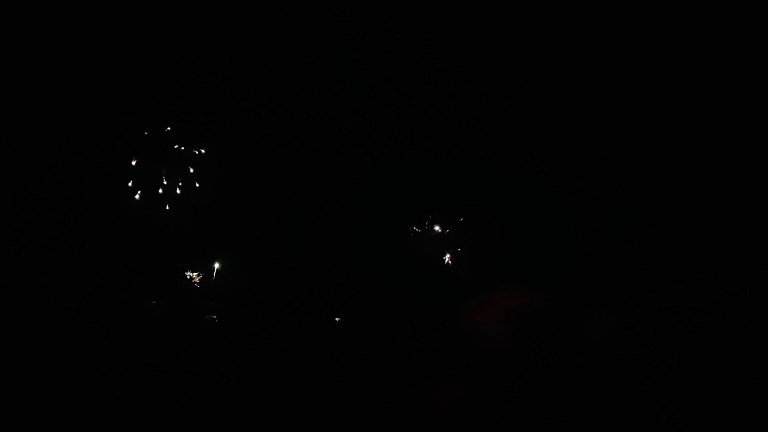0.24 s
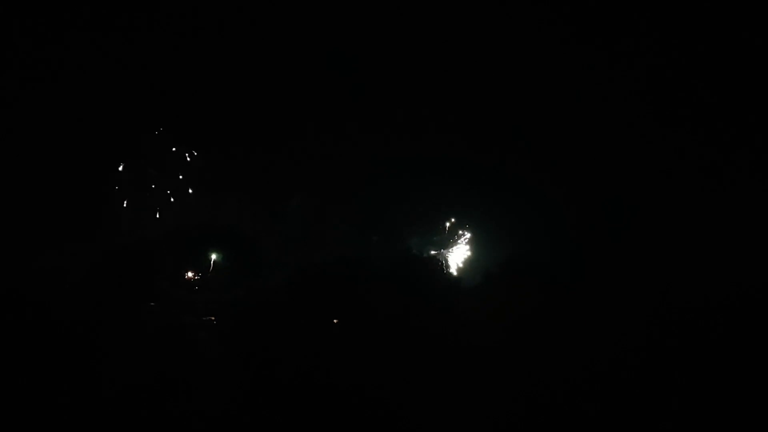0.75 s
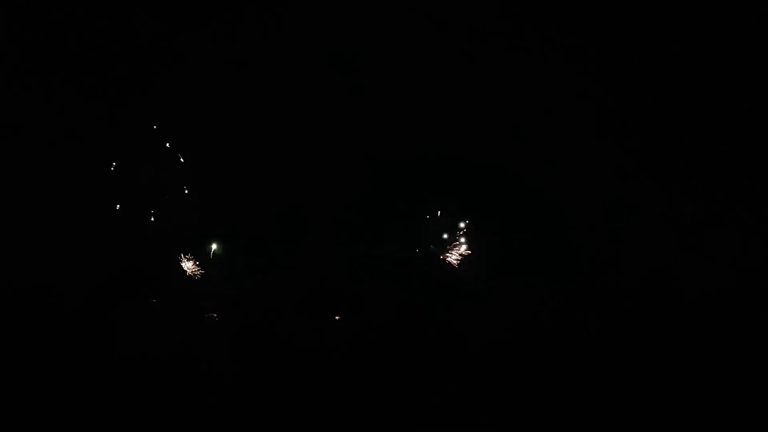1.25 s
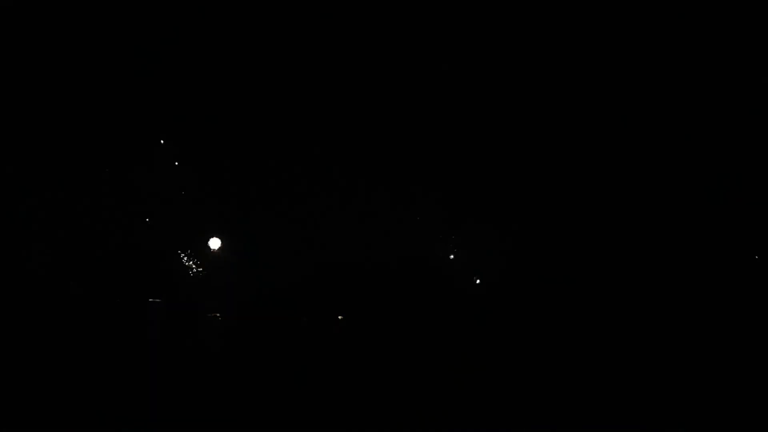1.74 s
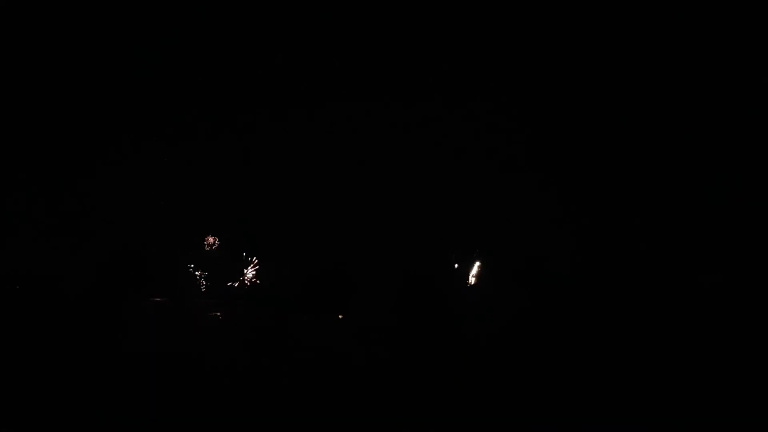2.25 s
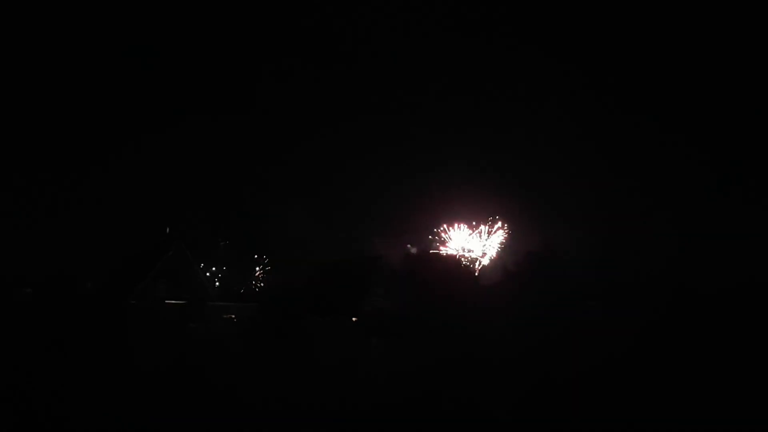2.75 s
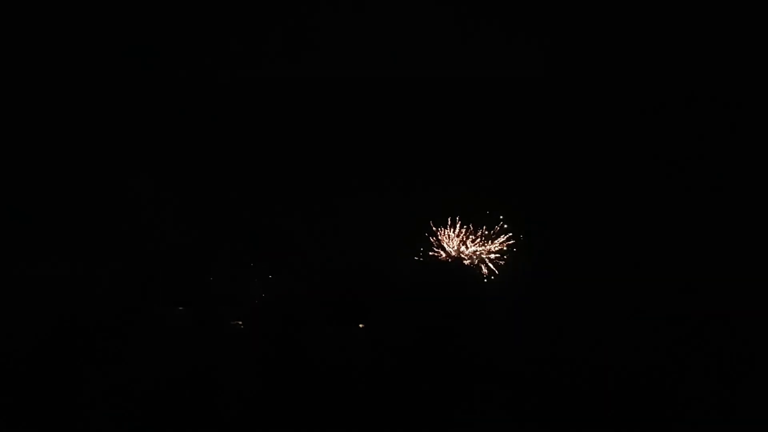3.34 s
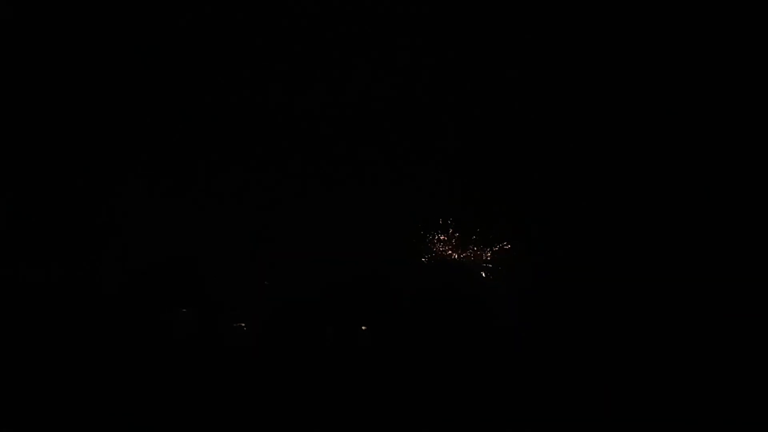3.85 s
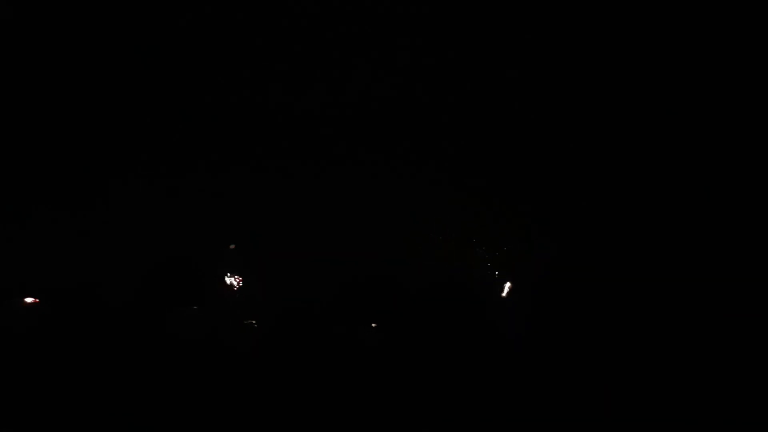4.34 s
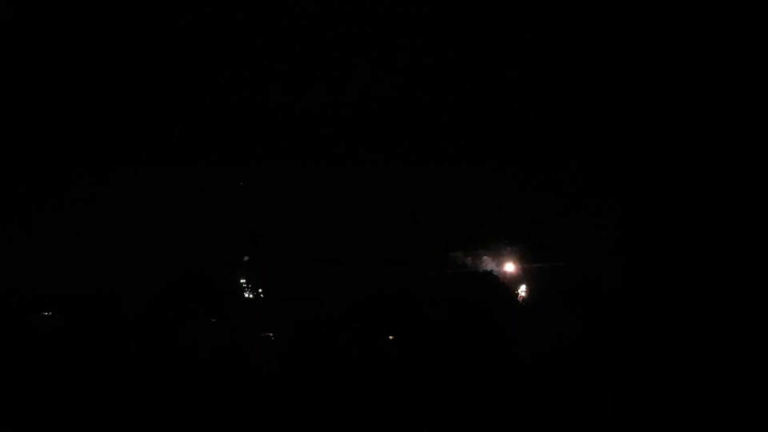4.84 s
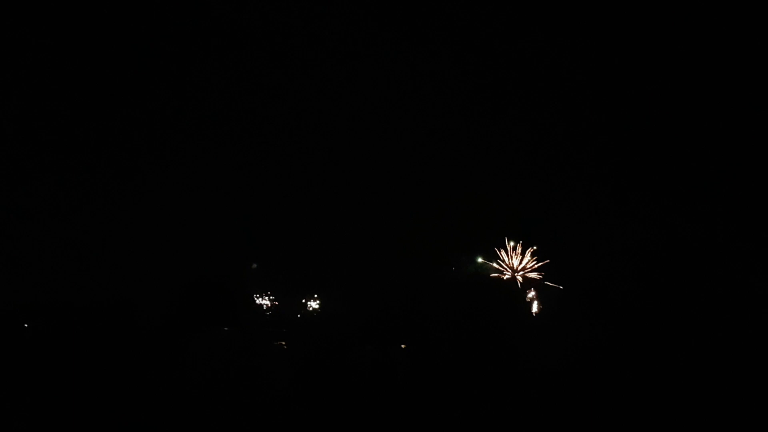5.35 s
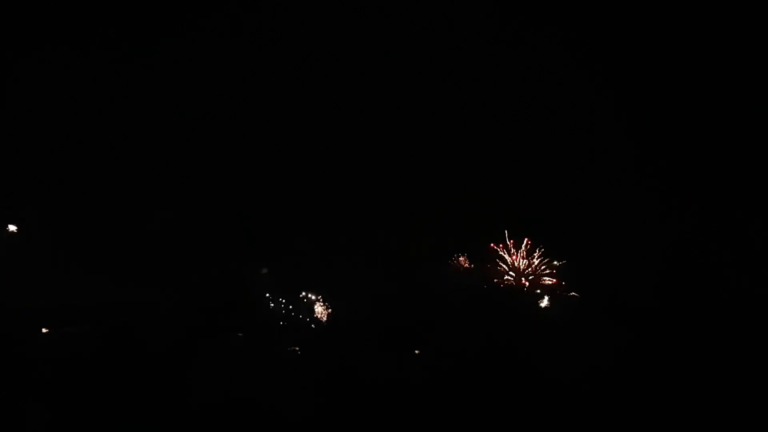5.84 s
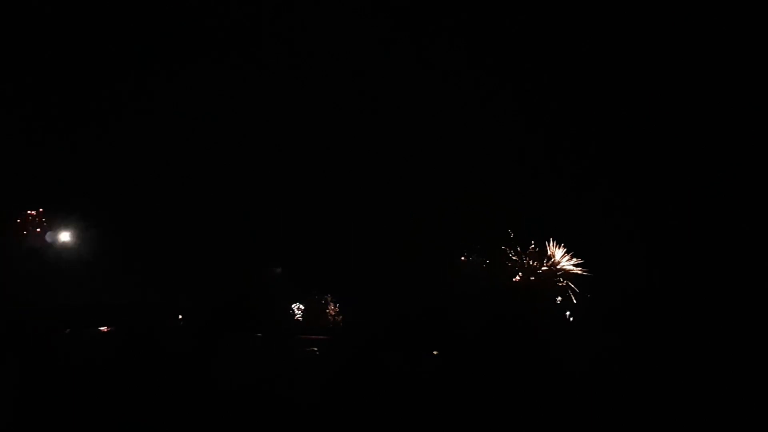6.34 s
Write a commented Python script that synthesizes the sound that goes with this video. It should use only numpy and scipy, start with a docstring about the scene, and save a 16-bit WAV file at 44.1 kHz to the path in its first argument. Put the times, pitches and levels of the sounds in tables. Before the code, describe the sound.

Outdoors at night, fireworks go off all around a town. A tight cluster of loud bangs opens, then crackling with tiny sharp snaps, more volleys, and one huge crack near the middle with a sizzling shower. Dull booms and a thin rocket whistle follow, then renewed bangs. Small stereo camera microphones overload on the strongest blasts.

```python
"""A town at night, with fireworks bursting all over it, heard from a distance on a camera's two small microphones.
Each nearer shell is a blast wave dulled by the air, bounced off the ground and scattered back by house fronts;
the strongest overload the microphone. Single stars nearby snap as tiny blasts.
Behind them countless far reports merge into a rolling mutter, and clouds of crackling stars swell and fade
as dense random clicks. A far rocket whistles and a brief whine falls, both as narrow bands of noise."""
import sys
import numpy as np
from scipy import signal
from scipy.fft import rfft, irfft, next_fast_len
from scipy.io import wavfile
from scipy.ndimage import map_coordinates

SR = 44100
rng = np.random.default_rng(int(sys.argv[2]) if len(sys.argv) > 2 else 0)


def wav_out(sig):
    """Save sig, one row per channel (or a flat mono array), as 16-bit PCM at SR to the path in sys.argv[1]."""
    wavfile.write(sys.argv[1], SR, np.round(np.clip(np.atleast_2d(sig).T, -1, 1) * 32767).astype(np.int16))


N = 290619


def amp(db):
    """Decibels to gain."""
    return 10 ** (np.asarray(db) / 20)


def unit(x):
    """Scale to rms 1."""
    return x / np.sqrt(np.mean(x ** 2) + 1e-20)


def along(points, hz):
    """Read (f/Hz, value) points on a log frequency axis."""
    f, values = np.transpose(points)
    return np.interp(np.log(hz + 1), np.log(f), values)


def curves(rows):
    """One value per sample for each column after the time."""
    times, *columns = np.transpose(rows)
    t = np.arange(N) / SR
    return [np.interp(t, times, column) for column in columns]


def wobble(rate):
    """A smooth random curve with rate knots a second."""
    knots = rng.standard_normal(int(N * rate / SR) + 4)
    return map_coordinates(knots, [np.arange(N) * rate / SR])


def filtered(x, response):
    """Apply a gain response(Hz) to x."""
    size = next_fast_len(N + SR // 2)
    spectrum = rfft(x, size) * response(np.fft.rfftfreq(size, 1 / SR))
    return irfft(spectrum, size)[..., :N]


def click(gain_db, size=4096):
    """The causal, minimum-phase pulse whose spectrum is gain_db(Hz)."""
    gain = amp(gain_db(np.fft.rfftfreq(size, 1 / SR)))
    cepstrum = irfft(np.log(np.maximum(gain, 1e-6)))
    # folding the cepstrum onto positive times makes the pulse causal
    cepstrum[1:size // 2] *= 2
    cepstrum[size // 2 + 1:] = 0
    return irfft(np.exp(rfft(cepstrum)))


def add(out, s, sound, lead_ms):
    """Mix a mono sound in at time s, earlier at the left port by lead_ms."""
    for port, side in enumerate((-1, 1)):
        start = round((s + side * lead_ms / 2 / 1000) * SR)
        out[port, start:][:len(sound)] += sound


def arrivals(rate, spread_db, size, port_ms=0.41):
    """Stereo impulses of rms 1 at random times, from all round the horizon, of scattered strength."""
    count = int(rate * size / SR) + 1
    when, angle = rng.random((2, count))
    scatter = np.clip(rng.standard_normal(count), -2.3, 2.3)
    strength = amp(spread_db * scatter) * rng.choice([-1, 1], count)
    lead = np.sin(2 * np.pi * angle) * port_ms * SR / 1000  # in samples
    ports = [np.round(when * size + side * lead / 2).astype(int) % size for side in (-1, 1)]
    return unit(np.array([np.bincount(i, strength, size) for i in ports]))


# The nearer shells, level being that of the direct wave and echo level relative to it:
# t/s, level/dB, wave length/ms, air loss/dB per kHz, left port lead/ms, ground bounce delay/ms, echo level/dB
NEARER_SHELLS = [(0.0138, -6, 2.2, 7.5, 0.25, .53, -2), (0.089, 7.5, 2.8, 0.9, 0.19, 0.79, -3.5),
                 (0.0989, 2, 2.96, 3.5, 0.0044, 1.72, -2.5), (0.1034, 5, 2.3, 1.4, 0.26, 0.62, -10),
                 (0.4755, -16, 1.55, 4, .11, 1.58, -23), (0.8409, -11, 3.55, 3, 0.051, 1.6, -1),
                 (0.986, -8.5, 0.78, 7, -0.3, 2.3, 2), (1.179, .3, 2.43, 4, 0.02, 2.3, 2.5),
                 (1.2097, -7, .9, 5, -0.41, 1.6, -11), (1.2899, 5, 2.3, 8, -0.31, 0.57, -5),
                 (1.3217, -1.1, 1.8, 4, 0.15, 0.88, -1.5), (1.355, -2.5, 2.07, 5.5, 0.31, 0.55, -16),
                 (1.5192, -21.5, 2.7, 7.5, 0.44, 3.4, 4), (1.7097, -15.5, 1.43, 8, -0.27, 0.86, -5),
                 (1.7817, -8, 2.4, 9, .13, .3, -6.5), (1.9427, -18, 2.5, 6, -0.3, 1.6, 1),
                 (1.9802, -14, 1.9, 7, -0.34, 3, -0.5), (2.0447, -8.5, 1.56, 8.5, -0.032, 0.61, 1.5),
                 (2.069, -9, 1.74, 8, -.25, 0.64, -15), (2.3388, 5, 2.36, 6.5, -0.35, 2.33, -10.5),
                 (2.3699, -2.5, 1.36, 2.5, -0.27, 1.7, -10), (2.3756, -2, 2.34, 4, -0.38, 0.59, -4),
                 (2.401, 0, 3.3, 2, -0.3, 2.6, -1.5), (2.4093, -1, 1.64, 5, -.36, 0.55, -9),
                 (2.4474, -1.5, 2.7, 2, -0.39, 2.81, 0), (2.4696, -1.5, 2.6, 1.4, .45, 1.7, -8),
                 (2.5165, -10.5, 1.7, 7, 0.37, 1.76, -12), (2.664, -16.5, 1.7, 4.5, -0.17, 1.6, 3),
                 (2.8765, -13, 2.6, 3.5, 0.098, 0.8, -0.5), (3.2712, 12, 1.78, 4.4, -0.054, 0.64, -12.5),
                 (3.2919, -1.5, 1.4, 2, 0.38, 0.6, 0), (3.3327, -3.5, 3.9, 3.5, -0.036, 1.67, -2.5),
                 (3.3413, -6.5, 3, 5, -0.086, 0.81, -9), (3.3945, -0.5, 2.23, 4, -0.0072, 3.06, -1),
                 (3.6819, -5, 11.5, 3.5, -0.055, 2.53, 2), (3.768, -19, 1.5, 6, -0.067, 1.1, 2),
                 (4.2058, -4, 3.55, 4, -0.25, 0.53, 3.5), (4.2246, -13, 6, 7, -0.21, 1.7, -8),
                 (4.2414, -4, 4.4, 3.5, -0.23, 0.64, 1), (4.2749, -10, 0.79, 6.5, -.29, .52, 3),
                 (4.352, -14.5, 1.6, 6.5, -0.063, 1.6, -4), (4.4965, -8.5, 2.9, 4.5, 0.34, 0.82, -1),
                 (4.533, -3, 2.64, 5.5, -0.36, 1.06, -2.5), (4.5996, -8.5, 1.45, 7.5, 0.46, 2.83, 0.5),
                 (4.8965, -10, 2.9, 6, -.32, 0.96, 3), (5.28, -12, 1.44, 4, -.16, 1.5, -3.5),
                 (5.3466, -4, 2.9, 9, -0.15, 1.25, 0.5), (5.487, -12, 3.4, 2.5, 0.19, 1.3, -1),
                 (5.6516, -12.5, 3.7, 11, -0.32, 1.5, -3), (5.725, 5, 2.67, 3.6, -0.042, 0.84, -3),
                 (5.7427, -1, 1.35, 3, 0.44, 2.1, 4.5), (5.7643, -5, 1.1, 2, .46, 0.7, -8),
                 (5.775, -4, 4.9, 2, 0.18, 1.46, -8), (5.9316, -2, 2.44, 4, .34, 0.52, -5),
                 (6.046, -6.5, 2.05, 7, -0.27, 1.2, -6), (6.065, -8, 2.56, 7, 0.11, 1.06, -5.5),
                 (6.1879, -14, 3.1, 3.5, -.16, 3.1, -4), (6.4486, -4, 1.6, 7.5, -0.18, 0.52, -4),
                 (6.4967, -11.5, 4.1, 4, 0, 2.65, 0.5), (6.5613, -5.5, 1.4, 5.5, 0.093, 2.16, 0)]


def shells(rows, early_air_db=-1.2, late_air_db=0.0, late_s=.07, bounce_share=0.56):
    """Every bang arrives straight and once more off the ground; the later an echo, the more air has dulled it."""
    out = np.zeros((2, N + SR))
    early = np.exp(-np.arange(SR // 2) / SR / late_s)
    for s, db, wave_ms, air_db, lead_ms, bounce_ms, echo_db in rows:
        front = amp(db) * blast(wave_ms, air_db)
        add(out, s, front, lead_ms)
        add(out, s + bounce_ms / 1000, bounce_share * front, lead_ms)
        walls = house_fronts(t60=0.46, build_s=0.0048, rate=3500, spread_db=4.0)
        for share, more_air_db in ((early, early_air_db), (1 - early, late_air_db)):
            echo = blast(wave_ms, air_db + more_air_db)
            tail = signal.fftconvolve(walls * share, echo[None], axes=1)
            out[:, round(s * SR):][:, :tail.shape[1]] += amp(db + echo_db) * tail
    return out[:, :N]


# Microphone colour on a blast: f/Hz, level/dB
MICROPHONE_COLOUR = [(100, -1), (700, .5), (1400, 0.5), (2200, 4.5), (4200, 3), (8000, 3.5), (9800, -9.5),
                     (16000, -2)]


def blast(wave_ms, air_db_per_khz, q=1.34, deepest_db=62):
    """A shock front, its suction phase and a rebound, rounded by the air; peak 1."""
    def gain_db(hz):
        s = 1j * hz * wave_ms / 1000
        wave = s * s / ((s * s + s / q + 1) * (s + 1))
        air_db = np.minimum(abs(air_db_per_khz) * hz / 1000, deepest_db)
        return 20 * np.log10(abs(wave) + 1e-4) - air_db + along(MICROPHONE_COLOUR, hz)
    pulse = click(gain_db)
    return pulse / abs(pulse).max()


def house_fronts(t60, build_s, rate, spread_db):
    """Separate reflections that set in after the blast and die away; mean energy 1 a port."""
    t = np.arange(SR // 2) / SR
    build = 1 - np.exp(-(t / build_s) ** 2)
    echoes = arrivals(rate, spread_db, size=len(t)) * amp(-60 * t / t60) * build
    return echoes / np.sqrt(np.sum(echoes ** 2) / 2)


def strays(reports_db, per_s=13, over_db=10, spread_db=4,
           wave_ms=1.74, air_db=6, lead_ms=.33, bounce_ms=1.1, echo_db=-5):
    """Rows for shells(): lesser shells all round at random times, louder while a volley is on."""
    count = int(per_s * N / SR)
    rows = []
    for when, strength, size, bearing, height in rng.uniform(-1, 1, (count, 5)):
        sample = int((when + 1) / 2 * (N - 1))
        db = reports_db[sample] + over_db + spread_db * strength
        rows.append((sample / SR, db, wave_ms * 2 ** size, air_db,
                     lead_ms * bearing, bounce_ms * 2 ** height, echo_db))
    return rows


# The nearest crackling stars, levels before the common trim: t/s, level/dB
NEAREST_STARS = [(0.5783, -27.5), (0.61, -24.5), (0.6266, -36), (0.7012, -33), (0.7916, -25), (0.8351, -25),
                 (0.8955, -23), (0.9383, -23), (0.9613, -25), (1.0153, -16), (1.0301, -17)]


def snaps(trim_db=-2.5, t60=0.014, wave_ms=0.35, air_db=0.7, lead_ms=-.2):
    """Single stars heard one by one: tiny blasts, each of its own size, smeared over a few ms."""
    out = np.zeros((2, N + SR))
    t = np.arange(SR // 50) / SR
    lesser = shower(start_s=.61, end_s=.97, first_db=-39, last_db=-25.5, spread_db=3, count=110)
    for s, db in [*NEAREST_STARS, *lesser]:
        size, distance, bearing = rng.uniform(.5, 2.2, 3)
        smear = rng.standard_normal(len(t)) * amp(-60 * t / t60)
        crack = signal.fftconvolve(smear, blast(wave_ms * size, air_db * distance))
        add(out, s, amp(db + trim_db) * crack / abs(crack).max(), lead_ms * bearing)
    return out[:, :N]


def shower(start_s, end_s, first_db, last_db, spread_db, count):
    """Rows (t/s, level/dB) of stars that burst at random, soon growing louder as their cloud opens."""
    age, size = rng.random((count, 2)).T
    db = first_db + (last_db - first_db) * np.sqrt(age) + spread_db * (2 * size - 1)
    return np.column_stack([start_s + (end_s - start_s) * age, db])


# Far volleys that swell and die away, added in power to the lull:
# t/s at the height, rise/s, fall/s, reports level/dB, crackle level/dB, sparks level/dB
FAR_VOLLEYS = [(0.0, .1, 0.047, -21, -27, -45), (0.25, 0.12, 0.11, -32.5, -38.5, -49),
               (0.881, 0.16, 0.24, -30, -29.5, -46.5), (1.08, 0.14, 0.13, -33, -37, -59),
               (1.28, 0.098, .075, -32, -26.5, -51), (1.77, 0.067, .08, -35.5, -41.5, -80),
               (2.22, .19, 0.24, -28, -30, -52.5), (2.46, 0.13, 0.24, -27, -31, -50.5),
               (3.251, 0.13, 0.12, -25.5, -18.5, -42.5), (4.39, 0.11, 0.29, -27.5, -34.5, -77),
               (4.6, 0.079, 0.047, -29, -30.5, -66), (5.39, 0.3, 0.47, -29.5, -31.5, -60.5),
               (5.7, 0.15, 0.067, -29.5, -34.5, -64), (6.08, 0.11, 0.24, -29.5, -38, -62.5),
               (6.47, 0.17, 1, -29.5, -35.5, -53.5)]
# Floor between the volleys: reports level/dB, crackle level/dB, sparks level/dB
LULL = (-40, -44, -85)


def volleys():
    """Levels in dB of reports, crackle and sparks: each volley swells like a bell curve, then fades steadily."""
    t = np.arange(N) / SR
    power = np.outer(amp(LULL) ** 2, np.ones(N))
    for s, rise_s, fall_s, *levels_db in FAR_VOLLEYS:
        swell = np.exp(-np.where(t < s, ((t - s) / rise_s) ** 2, (t - s) / fall_s))
        power += np.outer(amp(levels_db) ** 2, swell ** 2)
    return 10 * np.log10(power)


# Spectrum of the far crackle: f/Hz, relative level/dB per Hz
CRACKLE_SPECTRUM = [(200, -34.5), (600, 2.5), (1000, 1.5), (1450, -1), (1850, 3.5), (2400, -0.5),
                    (3000, -8), (4200, -9), (5000, -18), (6200, -23.5), (8000, -37.5), (9500, -59),
                    (16000, -52)]
# Spectrum of the nearer sparks: f/Hz, relative level/dB per Hz
SPARK_SPECTRUM = [(600, -19.5), (2000, -13), (4000, 4), (6000, 5), (8000, -5.5), (9500, -19.5),
                  (15000, -25)]


def stars(far_db, near_db, bright_hz=3700, brightening=0.23, full_db=-34):
    """Far crackle blurs into a sizzle, duller when faint; sparks from nearer clouds are brighter and grainier."""
    cloud = swarm(CRACKLE_SPECTRUM, rate=4800, spread_db=4.7, clump_db=1.6, ring_ms=16)
    sparks = swarm(SPARK_SPECTRUM, rate=2500, spread_db=5, clump_db=1.8, ring_ms=12)
    treble = filtered(cloud, lambda hz: 1 - 1 / (1 + (hz / bright_hz) ** 4))
    # treble is whole at full_db and above, and sinks as the cloud gets fainter
    nearness = amp(brightening * np.minimum(far_db - full_db, 0))
    return amp(far_db) * (cloud - (1 - nearness) * treble) + amp(near_db) * sparks


def swarm(spectrum, rate, spread_db, clump_db, ring_ms):
    """Many small explosions a second, in clumps; nearby surfaces smear each click a little; rms 1."""
    t = np.arange(SR // 50) / SR
    smear = rng.standard_normal((2, len(t))) * amp(-60 * t / (ring_ms / 1000))
    smear *= 0.45 / np.linalg.norm(smear, axis=1, keepdims=True)
    smear[:, 0] += 1  # the direct click
    pop = signal.fftconvolve(smear, click(lambda hz: along(spectrum, hz))[None], axes=1)
    pops = arrivals(rate, spread_db, size=N) * amp(clump_db * wobble(45))
    return unit(signal.fftconvolve(pops, pop, axes=1)[:, :N])


# A far whistling rocket: t/s, f/Hz, level/dB
ROCKET_WHISTLE = [(3.9, 3150, -70), (4.15, 2950, -52.5), (4.45, 3000, -54), (4.75, 3130, -51),
                  (4.95, 3090, -51.5), (5.3, 3120, -57), (5.62, 3150, -48.5), (5.9, 3150, -70)]
# A brief falling whine: t/s, f/Hz, level/dB
FALLING_WHINE = [(0.27, 960, -85), (0.3, 950, -38), (0.325, 915, -38), (0.37, 870, -85)]


def whistle(track, width_hz):
    """A thin whistle, smeared into a narrow band by its many paths over the roofs."""
    hz, db = curves(track)
    phase = 2 * np.pi * np.cumsum(hz) / SR
    ports = [wobble(width_hz) * np.cos(phase) + wobble(width_hz) * np.sin(phase) for port in range(2)]
    first_s, last_s = track[0][0], track[-1][0]
    sounding = np.interp(np.arange(N) / SR, [first_s, last_s], [1, 1], left=0, right=0)
    return sounding * amp(db) * unit(np.array(ports))


# Course of the far rumble, before its common lift: t/s, level/dB
RUMBLE_COURSE = [(0.0, -49), (0.09, -44), (0.35, -64), (0.73, -63), (1.08, -48.5), (1.76, -58),
                 (2.55, -54.5), (2.84, -60), (3.14, -58.5), (3.4, -46), (3.67, -47), (3.82, -42),
                 (4.44, -38.5), (4.7, -44), (5.16, -46.5), (5.56, -37.5), (6.33, -50), (6.59, -40)]
# Spectrum of the far rumble: f/Hz, relative level/dB per Hz
RUMBLE_SPECTRUM = [(20, -26.5), (45, -14.5), (70, -6), (115, -1), (150, -3), (260, -14.5), (600, -75)]
# Spectrum of the far thuds: f/Hz, relative level/dB per Hz
REPORT_SPECTRUM = [(40, -41), (130, -28.5), (250, -1.5), (380, -1.5), (650, -2), (1000, -9.5),
                   (1600, -12.5), (3000, -27.5), (8000, -71.5)]


def barrage(reports_db, rumble_lift_db=2):
    """Far shells overlap into a mutter of thuds over a rolling rumble."""
    course_db, = curves(RUMBLE_COURSE)
    rumble = swarm(RUMBLE_SPECTRUM, rate=300, spread_db=4, clump_db=2.0, ring_ms=11)
    thuds = swarm(REPORT_SPECTRUM, rate=1200, spread_db=3, clump_db=3.5, ring_ms=26)
    return amp(course_db + rumble_lift_db) * rumble + amp(reports_db) * thuds


# Shading by the camera body, left port minus right: f/Hz, level/dB
BODY_SHADE = [(60, .5), (250, -1), (500, -2.2), (1000, -3.6), (2000, -4.2), (4000, -3.6), (10000, -3.5)]


def scene():
    """All the fireworks, near to far; the camera body shades the left port."""
    reports_db, crackle_db, sparks_db = volleys()
    near = shells(NEARER_SHELLS) + shells(strays(reports_db)) + snaps()
    whistles = whistle(ROCKET_WHISTLE, width_hz=300) + whistle(FALLING_WHINE, width_hz=22.8)
    far = stars(crackle_db, sparks_db) + whistles + barrage(reports_db)
    # half of the difference goes to each port
    return filtered(near + far, lambda hz: amp(np.outer([.5, -.5], along(BODY_SHADE, hz))))


def record(dry, top_hz=16000):
    """The strongest blasts clip just under full scale; a steep low-pass then ends the band at top_hz."""
    clipped = np.clip(dry, -.97, .97)
    return filtered(clipped, lambda hz: 1 / (1 + (hz / top_hz) ** 120))


dry = scene()
out = record(dry)
wav_out(out)
```